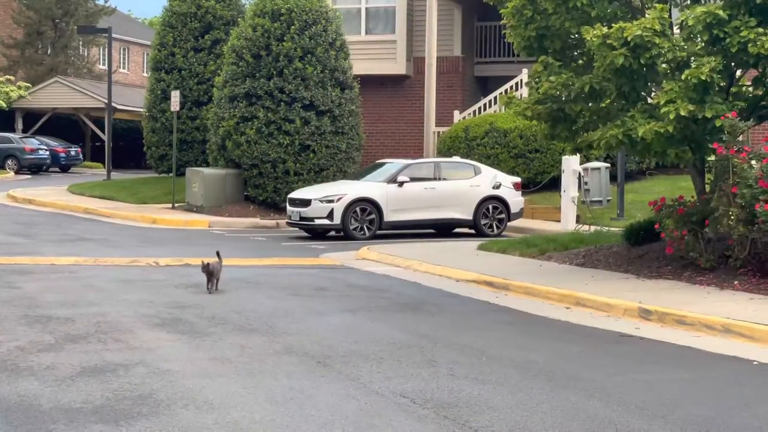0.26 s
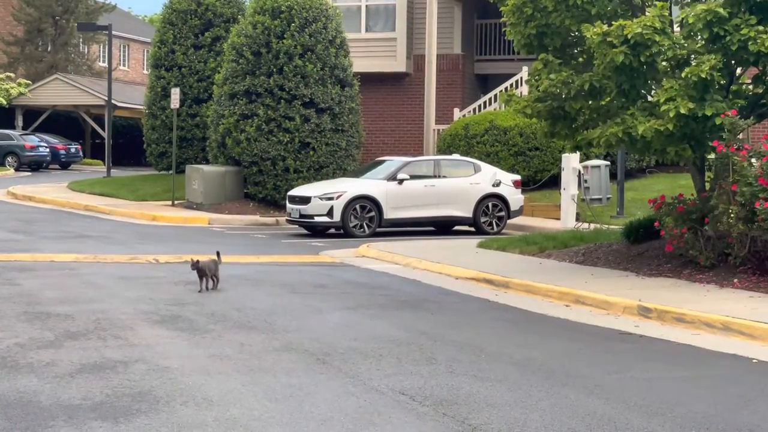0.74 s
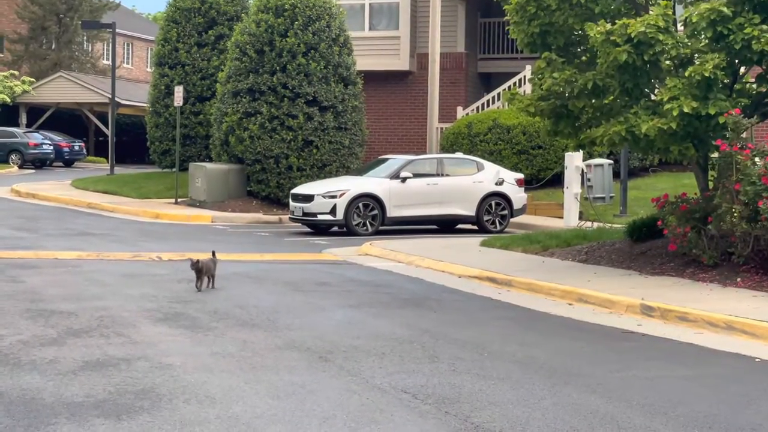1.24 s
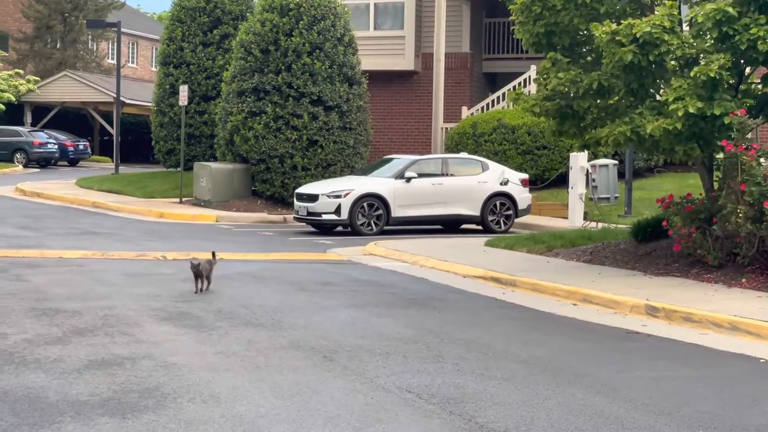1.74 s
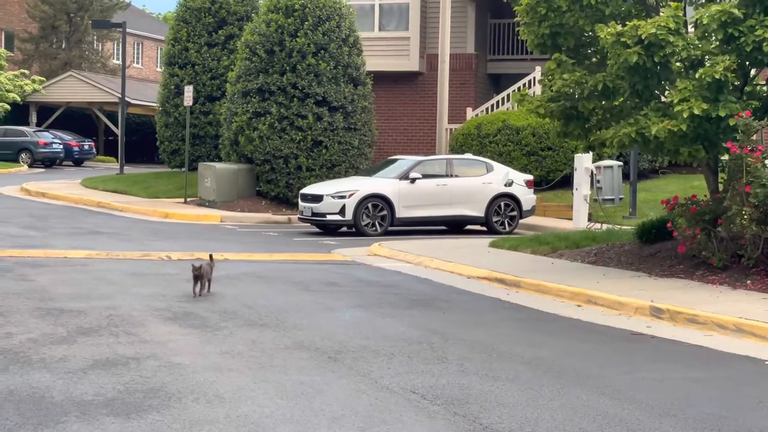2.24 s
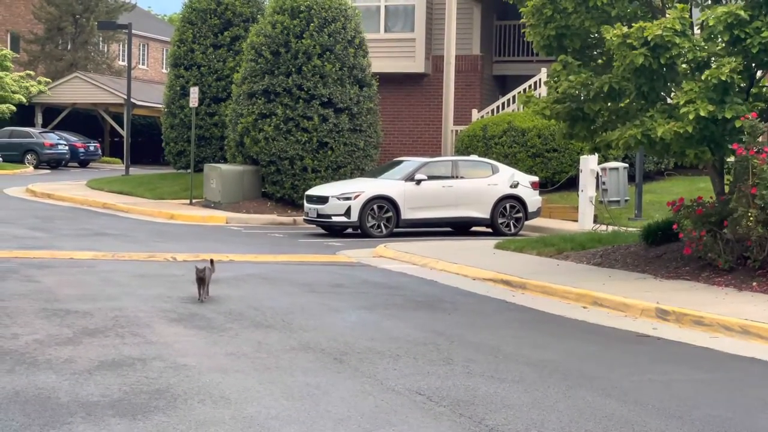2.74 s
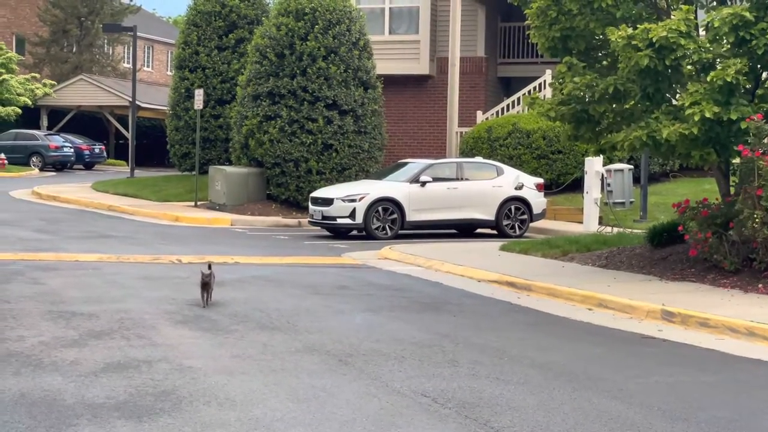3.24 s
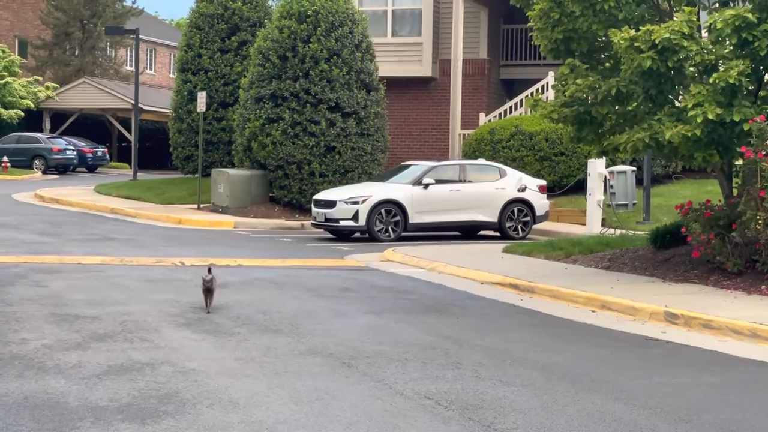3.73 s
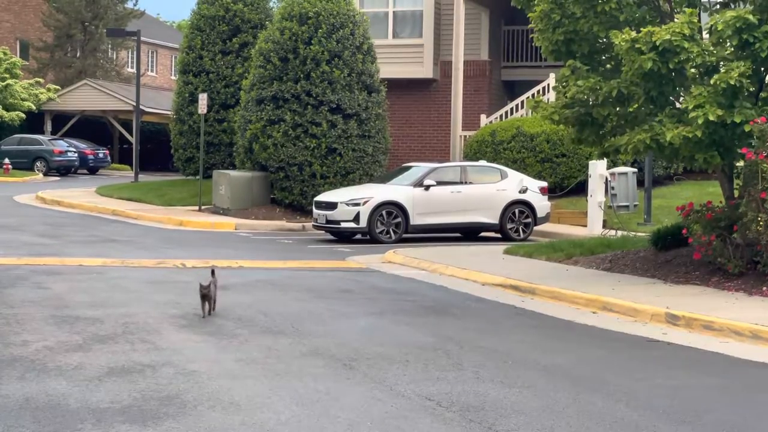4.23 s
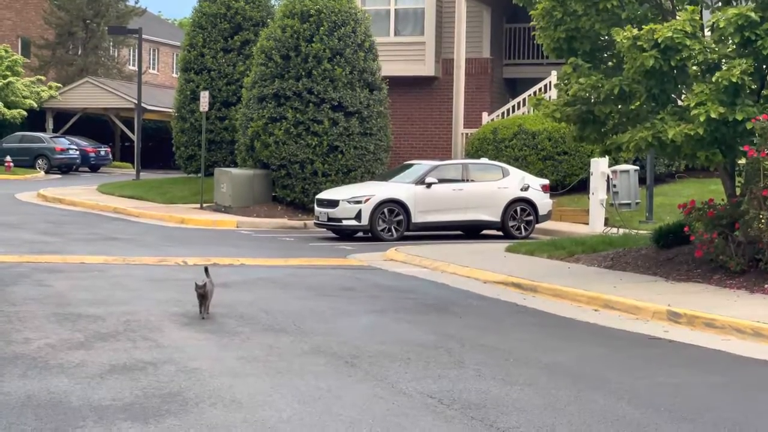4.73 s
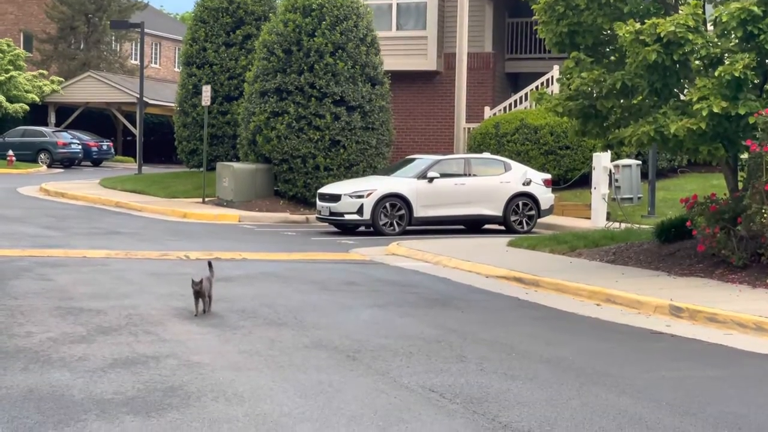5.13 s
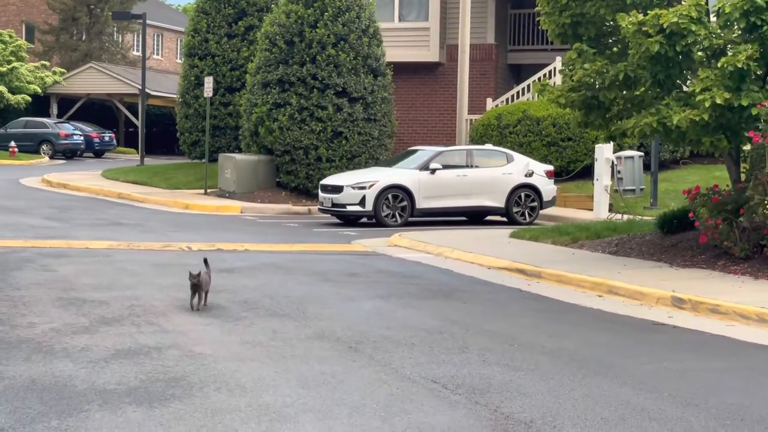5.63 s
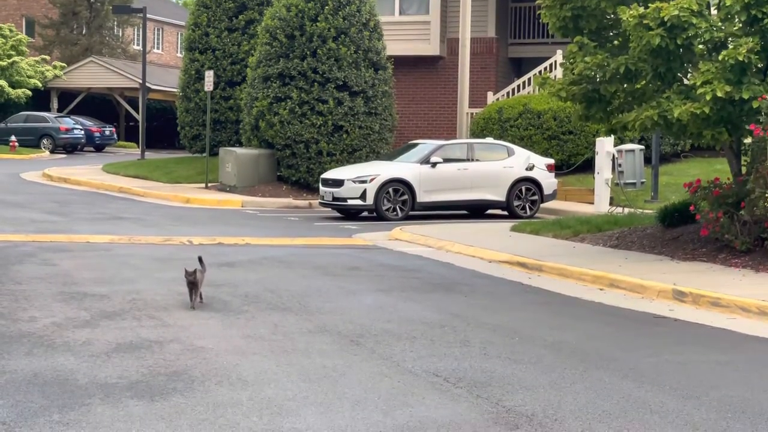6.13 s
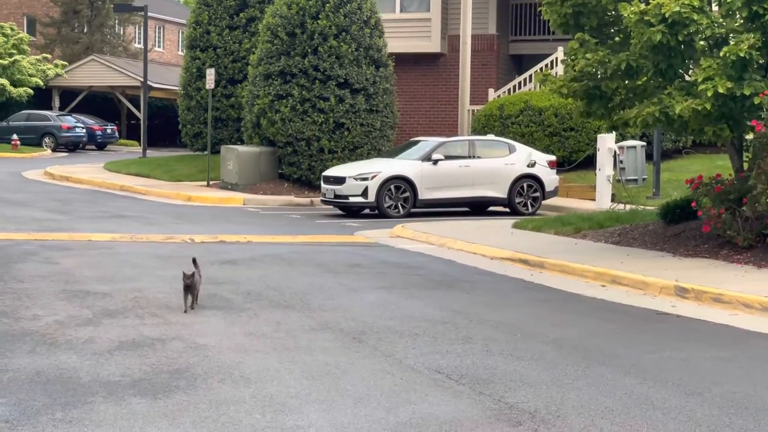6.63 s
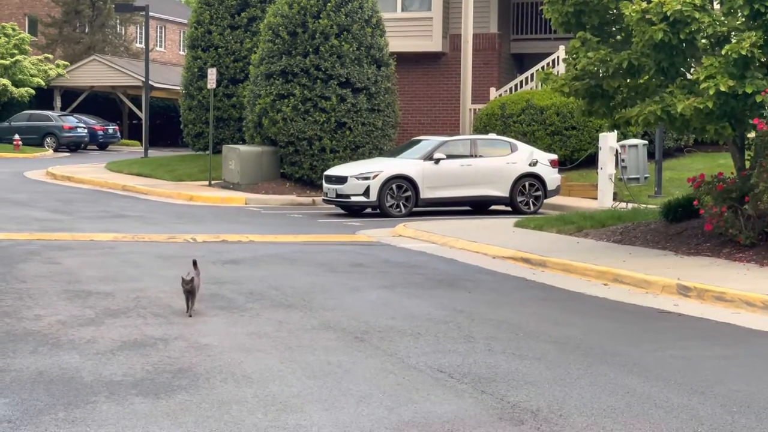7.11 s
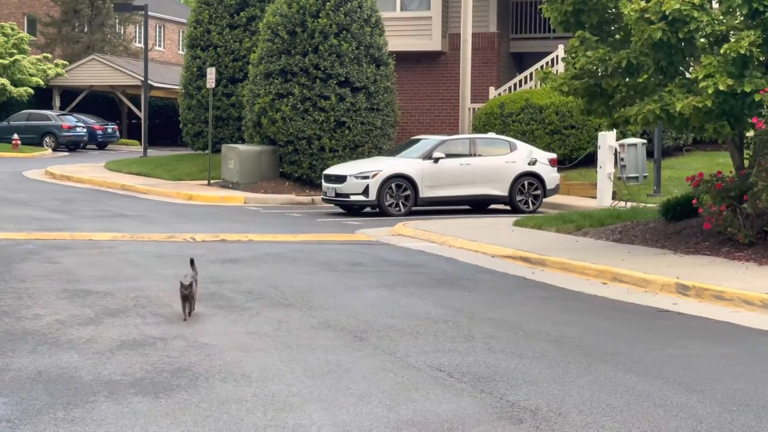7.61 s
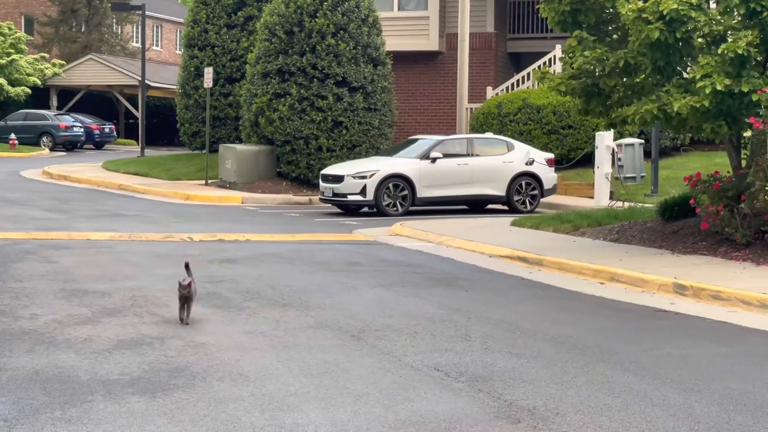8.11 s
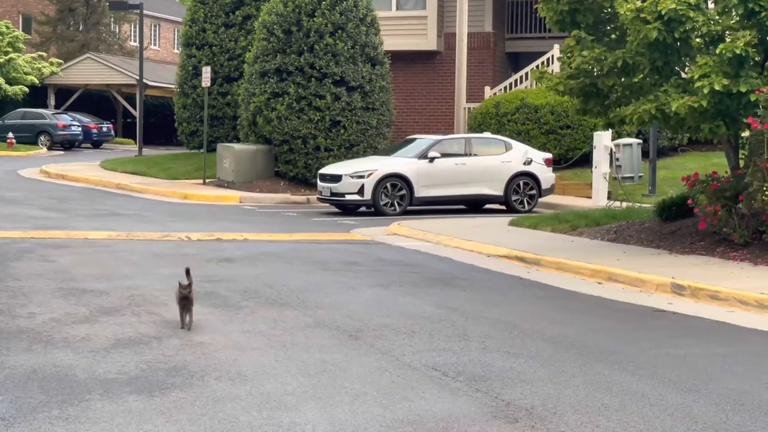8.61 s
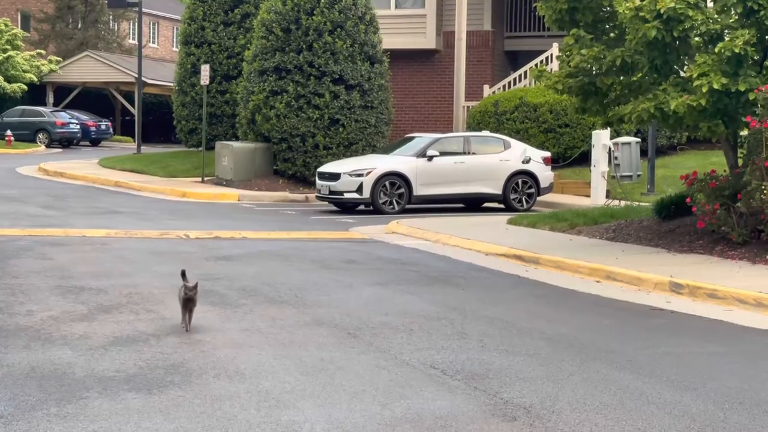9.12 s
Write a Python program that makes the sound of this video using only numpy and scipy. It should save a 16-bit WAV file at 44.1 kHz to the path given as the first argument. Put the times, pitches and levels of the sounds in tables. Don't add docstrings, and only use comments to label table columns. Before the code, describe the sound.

An outdoor car park with a constant low rumble of distant traffic and two idling engines softly throbbing. Several far songbirds call in short bursts: rasping chirps, quick slurs and low whistles, all blurred by leaves and walls. A vehicle pulls away faintly in the middle. Tiny bright clicks sound close to a small stereo microphone, and two fast buzzes and a thin high whistle come near the end.

```python
import sys
import numpy as np
from scipy import signal
from scipy.fft import rfft, irfft, next_fast_len
from scipy.io import wavfile
from scipy.ndimage import uniform_filter1d, minimum_filter1d

SR = 44100
rng = np.random.default_rng(int(sys.argv[2]) if len(sys.argv) > 2 else 0)


def makeup_ratio(level_db):
    decades = np.asarray(level_db, float) / 20
    return 10 ** decades


def store_wav(level_fs):
    pcm = np.round(np.clip(np.atleast_2d(level_fs), -1, 1) * 32767)
    wavfile.write(sys.argv[1], SR, pcm.T.astype(np.int16))


N = 412776

# [t/s, rumble level/dB]
TRAFFIC_LEVEL = [
    (0.0, -41.5),
    (.7, -41),
    (2.1, -40.5),
    (2.34, -41.5),
    (3.278, -38),
    (3.5, -42),
    (5.24, -45.5),
    (5.81, -41.5),
    (7.14, -43.5),
    (9.36, -42),
]
# [t/s, gain/dB]
VEHICLE_PASSES = [
    (.25, 11),
    (2.75, 8.5),
    (5.24, 4.5),
    (8.4, 2.5),
]
# [f/Hz, density/dB per Hz]
RUMBLE_SPECTRUM = [(12, -42), (24, -19.5), (45, -7), (68, -1), (102, -4.5), (217, -9), (305, -23.5),
                   (365, -39), (420, -29), (550, -42.5), (920, -120)]
ROAR_SPECTRUM = [(250, -31), (310, -2.5), (360, 13), (420, -5.5), (520, -45.5)]
TYRE_SPECTRUM = [(200, -22), (330, 4), (630, -1), (1000, -1), (1300, -6.5), (2000, -10.5), (2600, -14.5),
                 (3300, -19), (4200, -23), (5200, -28), (6300, -40.5), (8500, -48.5)]
AIR_SPECTRUM = [(3000, -42), (6300, -33), (8500, -37.5), (10500, -39), (12300, -42)]
# [f/Hz, correlation]
PORT_LIKENESS = [(60, 0.99), (200, 0.99), (460, 0.83), (1050, 0.66), (1600, 0.53), (2200, 1), (3600, 0.97),
                 (5400, 1), (9000, 0.99)]
IDLE_HZ = [57.16, 71.47]
# [t/s, peak level/dB]
IDLE_SURGES = [
    [(.13, -32), (.83, -33), (1.38, -39), (2.0, -42), (2.55, -33), (2.86, -36), (3.52, -41.5),
     (3.75, -34.5), (4.04, -41.5), (4.35, -33), (4.72, -33), (5.37, -36), (6.2, -37), (6.67, -33.5),
     (6.9, -35.5), (7.4, -36), (7.81, -34), (8.05, -37), (8.32, -34), (8.58, -44), (9.07, -45)],
    [(.1, -34), (.26, -35), (.56, -33.5), (.88, -35), (1.48, -44), (1.8, -35), (2.35, -34.5), (2.89, -34),
     (3.15, -44), (3.51, -34.5), (3.8, -39), (4.04, -40), (4.41, -36), (4.97, -35.5), (5.16, -37),
     (5.59, -30), (5.81, -32), (6.41, -35.5), (6.7, -46), (6.9, -45), (7.22, -31.5), (7.4, -35.5),
     (7.82, -36), (8.04, -34.5), (8.69, -37), (8.92, -37.5), (9.23, -37)],
]
# [start/s, length/s, centre f/Hz, swing/Hz, level/dB]
CHATTER_NOTES = [(0, 0.13, 3110, 392, -68), (-0.2, 0.052, 5800, 300, -85), (.93, 0.15, 5480, 300, -79),
                 (1.8, 0.046, 3830, 403, -74), (1.545, 0.19, 5100, 450, -70), (1.7, 0.17, 4760, 496, -71.5),
                 (2, 0.1, 3610, 300, -70), (2.64, 0.15, 4550, 350, -73), (2.78, .16, 5480, 600, -77.5),
                 (2.82, 0.085, 4160, 500, -68.5), (3.12, 0.057, 4250, 400, -69), (3.5, .15, 5800, 397, -95),
                 (3.34, 0.2, 3900, 652, -67), (3.475, 0.07, 5410, 600, -70), (4.5, 0.49, 4920, 710, -79.5),
                 (4.97, .12, 6500, 400, -86), (5.57, 0.18, 4470, 603, -77), (5.575, 0.14, 2550, 202, -65),
                 (6.205, 0.093, 5450, 400, -76), (6.31, 0.18, 5500, 700, -80), (6.5, 0.045, 3920, 650, -78),
                 (6.71, 0.15, 4700, 587, -78), (8.5, 0.17, 4400, 790, -68.5),
                 (9.075, 0.099, 5020, 550, -68)]
# [start/s, length/s, lower voice f/Hz, lower level/dB, upper level/dB]
RASPING_CHIRPS = [
    (0.91, 0.19, 3760, -63.5, -68),
    (1.918, 0.15, 3670, -63.5, -71.5),
    (2.829, 0.18, 3300, -65, -74),
    (3.249, 0.18, 3700, -63, -67),
    (5.026, .17, 3396, -62.5, -68.5),
    (6.297, 0.14, 3400, -63.5, -74),
    (9.069, 0.17, 3580, -61.5, -63),
]
# [start/s, length/s, from f/Hz, to f/Hz, level/dB]
SMALL_SLURS = [(.15, 0.026, 4050, 4300, -73), (.174, 0.017, 4170, 4620, -67), (.19, 0.012, 6000, 5270, -65),
               (.215, 0.021, 5420, 4750, -65.5), (.236, .012, 4300, 4080, -63),
               (.262, 0.024, 3930, 4000, -68), (.282, 0.042, 4140, 5100, -62),
               (.302, 0.014, 5800, 5400, -66), (.324, 0.019, 5420, 4480, -67), (.92, .03, 4900, 5330, -71),
               (1.6, 0.028, 5740, 4960, -69), (.93, 0.037, 4700, 3880, -71), (.935, 0.035, 4920, 5600, -71),
               (1.588, 0.025, 5750, 5290, -69), (1.64, 0.029, 3580, 5200, -64),
               (1.672, .03, 3620, 5400, -63), (1.895, .019, 5270, 4470, -63),
               (2.255, 0.015, 5560, 5100, -73.5), (3.255, 0.016, 5100, 4400, -66),
               (3.552, 0.053, 3860, 4600, -68), (6.222, 0.019, 3830, 4170, -71),
               (6.223, 0.032, 4330, 4650, -70), (6.256, 0.014, 4700, 4320, -68),
               (6.296, 0.016, 4600, 4170, -62), (6.255, .012, 3770, 4050, -67),
               (6.302, 0.053, 2950, 3420, -65), (6.46, .02, 3900, 4580, -69)]
# [start/s, length/s, f/Hz, level/dB]
SMALL_PEEPS = [(.97, .05, 4510, -72), (.988, .032, 3390, -69), (1.54, .015, 6150, -81),
               (1.617, 0.022, 5200, -71), (1.916, 0.028, 3880, -64), (1.94, 0.022, 3540, -59.5),
               (2.008, 0.053, 3930, -71), (2.615, 0.051, 5340, -67.5), (3.272, .022, 3900, -62),
               (3.291, .045, 3400, -70), (3.35, .022, 3890, -63), (5.0, 0.059, 5700, -78),
               (5.007, 0.029, 4700, -72), (6.235, 0.025, 4200, -67), (6.24, 0.028, 4600, -67),
               (6.32, 0.046, 4600, -70), (6.36, 0.022, 3050, -66.5), (6.44, .04, 4530, -70),
               (6.45, 0.026, 4150, -70), (2.985, .025, 3000, -67), (3.03, .03, 3400, -74),
               (7.575, 0.033, 4250, -71), (9.031, .047, 3770, -66), (9.075, 0.027, 3450, -65),
               (9.108, 0.026, 3870, -64), (9.184, 0.032, 3880, -62.5), (9.105, .045, 3440, -62),
               (9.347, 0.014, 3300, -59.5)]
# [start/s, length/s, from f/Hz, to f/Hz, level/dB]
ARCHED_NOTES = [
    (6.258, .038, 4330, 2830, -63),
    (6.277, .046, 4230, 3220, -60),
    (6.306, .04, 4220, 3880, -58.5),
    (6.328, .028, 3700, 2880, -65),
    (6.352, .04, 3420, 2880, -61),
    (6.41, .025, 3400, 2700, -64),
    (5.078, .048, 3500, 2300, -57.5),
    (2.93, .04, 3500, 2850, -66),
]
# [start/s, level/dB]
SIGH_CALLS = [
    (.69, -80),
    (1.586, -77),
    (2.221, -80),
    (6.562, -80),
]
# [from f/Hz, to f/Hz]
SIGH_PITCH_HZ = (5800, 5200)
# [start/s, length/s, from f/Hz, to f/Hz, level/dB]
LOW_SINGER_SLURS = [(.27, 0.057, 3650, 3050, -65), (3.45, 0.073, 2880, 2430, -64),
                    (3.845, 0.14, 2965, 2410, -67), (4.412, .052, 3454, 2780, -58),
                    (4.418, 0.041, 3850, 3050, -60.5), (4.553, 0.059, 2680, 2410, -66),
                    (4.776, 0.028, 3600, 4000, -67), (5.01, 0.047, 3900, 3660, -65),
                    (5.045, 0.018, 2780, 3480, -55.5), (5.052, 0.018, 3740, 4060, -70),
                    (5.135, 0.021, 2150, 2300, -58), (5.34, 0.016, 2680, 2420, -63),
                    (5.575, 0.08, 2694, 2340, -61.5), (5.594, 0.087, 3710, 2980, -65.5),
                    (5.734, 0.065, 2720, 2530, -64.5),              (7.281, 0.014, 2510, 2300, -64),
                    (7.607, 0.063, 3740, 3450, -72.5)]
# [start/s, length/s, f/Hz, level/dB]
LOW_SINGER_HELD = [(4.02, 0.092, 2625, -64.5), (4.234, 0.018, 3270, -71), (4.46, 0.064, 2814, -55),
                   (4.542, 0.067, 2900, -58), (4.604, 0.028, 2480, -52.5), (4.528, 0.015, 2910, -61),
                   (4.628, .13, 2594, -59), (4.68, 0.05, 2890, -64), (4.788, 0.063, 2460, -59),
                   (4.862, 0.074, 2605, -68), (4.99, 0.043, 2740, -66), (5.031, 0.037, 2740, -56),
                   (5.065, .04, 2710, -65), (5.13, 0.078, 2760, -79), (5.53, 0.044, 3035, -59.5),
                   (5.814, 0.028, 2570, -64.5), (5.865, 0.018, 2470, -62)]
CLICK_TIMES_S = [.7762, .839, 5.2902, 7.841, 7.9139, 8.1314]
# [peak/dB, low, middle, top ring re peak/dB, bounce gain/dB]
CLICK_LEVELS = [
    (-32.5, -16, -3, -6, -3),
    (-34, -10, -10, -5, 3),
    (-31.5, -15, -25, -9, -10),
    (-60, -3, 3, -14, -5),
    (-31.5, -17, -15, -7, -34),
    (-29, -12, -6.5, -7, -7),
]
RING_HZ = [8550, 3600, 6000, 11250, 15200, 9950]
RING_LAG_MS = [.3, 1.0, .7, .25, .2, .45]
RING_WIDTH_MS = [.155, .4, .25, .3, .2, .3]
TIP_DB = [-21, -50, -30, -45, -20, -42]
EDGE_DB = [-5, -8, -8, -20, -5, -2]
MAIN_RING_RATIO = [.92, .95, .9, .75, 1.0, 1.0]
# [delay/ms, level/dB]
CLICK_BOUNCES = [
    (1.4, -12),
    (2.7, -10),
    (4.0, -16),
]
# [turning point/s, lead-in level/dB, fall level/dB, flick level/dB]
HOOKED_CALLS = [
    (1.842, -76, -74, -70),
    (2.725, -94, -83, -79),
    (4.577, -96, -67, -61),
    (5.702, -80, -69, -63),
    (6.811, -80, -71, -63),
    (7.82, -78, -69, -62.5),
]
HOOK_CURVE_S = (-.055, -.03, -.002, .012, .028)
HOOK_CURVE_HZ = (4350, 4150, 3980, 4130, 4520)
# [t/s, f/Hz, level/dB]
ENGINE_PULL = [
    (4.0, 111.1, -54),
    (4.07, 111.5, -47),
    (4.18, 103, -49.5),
    (4.658, 103, -41),
    (4.954, 105, -49),
    (4.968, 104.3, -41),
    (5.1, 102, -67),
]
# [t/s, centre f/Hz, swing rate/Hz, level/dB]
BUZZ_CURVES = [
    [(8.29, 4800, 180, -85), (8.322, 4810, 165, -56.5), (8.352, 4780, 164, -54.5), (8.4, 4780, 153, -58.5),
     (8.435, 4736, 150, -56), (8.53, 4745, 137, -59.5), (8.6, 4710, 160, -74), (8.62, 4730, 160, -78)],
    [(8.735, 4695, 150, -70), (8.78, 4645, 134, -49), (8.8, 4682, 140, -50.5), (8.87, 4660, 160, -55),
     (8.915, 4700, 143, -48), (8.97, 4640, 170, -72), (9.04, 4674, 164, -57), (9.07, 4700, 164, -83)],
]
BUZZ_DEPTH_HZ = [275, 250]
# [t/s, level/dB]
SEEP_LEVEL = [
    (9.145, -91),
    (9.164, -67),
    (9.204, -55.5),
    (9.228, -76),
    (9.25, -57),
    (9.28, -48.5),
    (9.336, -65),
    (9.36, -53),
]
# [f/Hz, phase/rad]
PORT_PHASE_RAD = [(0, 0), (300, .1), (1120, .45), (1720, -.6), (2000, -.1), (3300, .6), (4700, .5),
                  (5700, .45), (6700, .2), (7700, .5), (8750, 0), (9200, -1.5), (9900, -2.6), (10500, -3.5),
                  (11100, -4.9), (11700, -5.7), (12300, -6.9), (13300, -7.9)]
# [f/Hz, level/dB]
PORT_BALANCE_DB = [(60, 0.5), (200, 1), (350, 1.5), (640, 2), (1150, 2.5), (2080, .5), (3750, -.5),
                   (6770, 0)]

ROAR_DB, TYRES_DB, TYRES_FADE_DB_PER_S, PASS_S = -23, -56.5, 0.43, 0.4
FAR_EDGE_HZ, TAIL_EDGE_HZ, MIC_EDGE_HZ = 12550, 9000, 16300
IDLE_DB, SURGE_RISE_DB_PER_S, SURGE_FALL_DB_PER_S = -47.5, 167.5, 106.5
CHATTER_PER_S, LOWER_SWING_HZ, UPPER_SWING_HZ = 105, 360, 420
UPPER_RATIO, LOWER_LATE, SLIDE = 1.25, .22, .1
PEEP_DROOP, SIGH_S = .015, 0.09
SAG, ARCH = .42, .76
LEAD_EARLY_S, LEAD_S, LEAD_HZ = 0.11, 0.059, 5270
BUZZ_UNEVEN, SEEP_HZ, LIMIT = .028, 7255, .06


def evened(x):
    return x / np.sqrt(np.mean(x ** 2) + 1e-20)


def read(points, hz):
    f, value = np.transpose(points)
    return np.interp(np.log(hz + 1), np.log(f + 1), value)


def add(mix, s, sound):
    part = mix[max(round(s * SR), 0):][:len(sound)]
    part += sound[:len(part)]


def drift(n, hz):
    size = max(int(SR / hz / 2), 1)
    wander = uniform_filter1d(uniform_filter1d(rng.standard_normal(n), size), size)
    return evened(wander - wander.mean())


def note(hz, db, edge):
    sine = np.sin(2 * np.pi * np.cumsum(hz) / SR)
    return np.sqrt(2) * makeup_ratio(db) * sine * signal.windows.tukey(len(hz), np.clip(edge, 0, 1))


def tone(rows):
    s, hz, db = np.transpose(rows)
    t = np.arange(N) / SR
    level = uniform_filter1d(makeup_ratio(np.interp(t, s, db, left=-140, right=-140)), size=200)
    return np.sqrt(2) * level * np.sin(2 * np.pi * np.cumsum(np.interp(t, s, hz)) / SR)


def yard(x, t60, gap_ms):
    t, out = np.arange(0, min(t60, .5), 1 / SR), 0
    for k in range(3):
        taps = rng.standard_normal((2, len(t))) * (rng.random((2, len(t))) < .05)
        taps *= makeup_ratio(-60 * t / t60) * (t > gap_ms / 1000)
        taps[1] = 2.6 * taps[0] + 0.5 * taps[1]
        taps /= np.linalg.norm(taps, axis=1)[:, None]
        share = np.sqrt(2 / 3) * np.cos(np.pi * (np.arange(N) / SR * 16 + k / 3))
        out = out + signal.oaconvolve(share * x[None], taps, axes=1)[:, :N]
    return out


def traffic():
    frames, hz = N // 512 + 5, np.fft.rfftfreq(2048, 1 / SR)
    a, b, c, d, patches = rng.standard_normal((frames, 1025, 5)).T
    patches = evened(uniform_filter1d(uniform_filter1d(patches, 6, 0), 6, 1))
    t = np.arange(frames) * 512 / SR
    s, level_db = np.transpose(TRAFFIC_LEVEL)
    flow_db = np.interp(t, s, level_db)
    passing_db = sum(db * np.exp(-((t - at) / PASS_S) ** 2) for at, db in VEHICLE_PASSES)
    rumble = makeup_ratio(read(RUMBLE_SPECTRUM, hz)[:, None] + flow_db + 26.0)
    roar = makeup_ratio(read(ROAR_SPECTRUM, hz)[:, None] + flow_db + ROAR_DB + passing_db + 11.5)
    tyres = makeup_ratio(read(TYRE_SPECTRUM, hz)[:, None] + TYRES_DB - TYRES_FADE_DB_PER_S * t + 13.5)
    air_power = makeup_ratio(2 * read(AIR_SPECTRUM, hz) - 92.0)[:, None]
    same = np.clip(read(PORT_LIKENESS, hz), -1, 1)[:, None]
    left = a + 1j * b
    z = np.array([left, same * left + np.sqrt(1 - same ** 2) * (c + 1j * d)])
    z *= np.sqrt(rumble ** 2 + roar ** 2 + tyres ** 2 + air_power) * makeup_ratio(1.32 * patches - 25.5)
    z /= np.sqrt(1 + (hz / FAR_EDGE_HZ) ** 160)[:, None]
    return signal.istft(z, nperseg=2048, noverlap=1536)[1][:, :N]


def idling_engines():
    t, out = np.arange(0, N / SR + .01, .005), 0
    for hz, rows in zip(IDLE_HZ, IDLE_SURGES):
        s, peak_db = np.transpose(rows)[:, :, None]
        db = peak_db - np.maximum(SURGE_RISE_DB_PER_S * (s - t), SURGE_FALL_DB_PER_S * (t - s))
        db = np.interp(np.arange(N) / SR, t, np.maximum(db.max(0), IDLE_DB))
        out = out + note(hz * (1 + 0.0518 * drift(N, 4.91)), db - 1.5, 0)
    return out


def warbles(rows, per_s, uneven, edge, slide):
    out = np.zeros(N)
    for k, (start, long, centre_hz, swing_hz, db) in enumerate(rows):
        if k % 8 == 0:
            pace, depth, wander, gasp = drift(N, 40), drift(N, 50), drift(N, 95), drift(N, 70)
        n = round(long * SR)
        at = np.minimum(round(start * SR) + np.arange(n) + k % 8 * 9000, N - 1 - np.arange(n))
        turn = 2 * np.pi * np.cumsum(per_s * (1 + uneven * pace[at])) / SR
        swing = .5 * np.sin(turn) * (1 - uneven * np.tanh(depth[at])) + .6 * wander[at]
        hz = centre_hz * (1 + slide * np.linspace(.5, -.5, n)) + swing_hz * swing
        add(out, start, note(hz, db + np.linspace(2.5, -3.5, n) + 3.3 * gasp[at], edge))
    return out


def harsh_calls():
    rows = list(CHATTER_NOTES)
    for s, long, hz, _, db in RASPING_CHIRPS:
        rows.append((s, long * (1 - LOWER_LATE / 2), hz * UPPER_RATIO, UPPER_SWING_HZ, db))
    for s, long, hz, db, _ in RASPING_CHIRPS:
        rows.append((s + long * LOWER_LATE, long * (1 - LOWER_LATE), hz, LOWER_SWING_HZ, db))
    return warbles(rows, CHATTER_PER_S, .35, .6, SLIDE)


def whistles(rows, tremor_db, bend=SAG):
    out, waver, tremor = np.zeros(N), drift(N, 120), drift(N, 90)
    for start, long, from_hz, to_hz, db, *own_bend in rows:
        u = np.linspace(0, 1, round(long * SR))
        share = own_bend[0] if own_bend else bend
        middle_hz = min(from_hz, to_hz) + share * abs(to_hz - from_hz)
        hz = np.polyval(np.polyfit([0, .5, 1], [from_hz, middle_hz, to_hz], deg=2), u)
        at = np.minimum(round(start * SR) + np.arange(len(u)), N - 1)
        add(out, start, note(hz * (1 + 0.007 * waver[at]), db + tremor_db * tremor[at], 0.3))
    return out


def small_birds():
    rows = SMALL_SLURS + [(*row, ARCH) for row in ARCHED_NOTES]
    rows += [(s, SIGH_S, *SIGH_PITCH_HZ, db) for s, db in SIGH_CALLS]
    rows += [(s, long, hz * (1 + PEEP_DROOP), hz * (1 - PEEP_DROOP), db) for s, long, hz, db in SMALL_PEEPS]
    rows += [(s - LEAD_EARLY_S, LEAD_S, LEAD_HZ, LEAD_HZ, lead_db) for s, lead_db, _, _ in HOOKED_CALLS]
    return whistles(rows, 2.4)


def low_singer():
    return whistles(LOW_SINGER_SLURS + [(s, long, hz, hz, db) for s, long, hz, db in LOW_SINGER_HELD], 2.0)


def clicks():
    out, ms = np.zeros(N), np.arange(200) * 1000 / SR
    each = zip(CLICK_TIMES_S, CLICK_LEVELS, TIP_DB, EDGE_DB, MAIN_RING_RATIO)
    for s, (db, *rel_db, bounce_db), tip_db, edge_db, ratio in each:
        ring_hz = [RING_HZ[0] * ratio] + RING_HZ[1:]
        ring_db = [0] + rel_db + [tip_db, edge_db]
        phases = np.resize(rng.random(5), 6)
        snap = 0
        for hz, lag, width, r, p in zip(ring_hz, RING_LAG_MS, RING_WIDTH_MS, ring_db, phases):
            swell = np.exp(-((ms - .7 - lag) / width) ** 2)
            snap = snap + makeup_ratio(db + r) * swell * np.sin(2 * np.pi * (hz * ms / 1000 + p))
        add(out, s, snap)
        for (late_ms, echo_db), chance in zip(CLICK_BOUNCES, rng.uniform(0.81, 0.91, 3)):
            add(out, s + late_ms * chance / 1000, makeup_ratio(echo_db + bounce_db) * snap)
    return out


def hooks():
    out, t = np.zeros(N), np.arange(HOOK_CURVE_S[0], HOOK_CURVE_S[-1], 1 / SR)
    hz = uniform_filter1d(np.interp(t, HOOK_CURVE_S, HOOK_CURVE_HZ), size=400, mode="nearest")
    for s, _, fall_db, flick_db in HOOKED_CALLS:
        db = np.interp(t, [-.008, .008], [fall_db, flick_db])
        add(out, s + HOOK_CURVE_S[0], note(hz, db, 0.15))
    return out


def engine_pull():
    return tone(ENGINE_PULL)


def buzzes():
    out, t = np.zeros(N), np.arange(N) / SR
    for rows, swing_hz in zip(BUZZ_CURVES, BUZZ_DEPTH_HZ):
        s, centre_hz, per_s, db = np.transpose(rows)
        turn = 2 * np.pi * np.cumsum(np.interp(t, s, per_s) * (1 + BUZZ_UNEVEN * drift(N, 40))) / SR
        hz = np.interp(t, s, centre_hz) + swing_hz * np.sin(turn) * (1 + 0.1 * drift(N, 25))
        throb_db = 2.5 * np.cos(turn) + .8 * np.sin(turn) + 1.8 * np.cos(turn / 2) + 1.5 * drift(N, 45)
        out += note(hz, np.interp(t, s, db, left=-140, right=-140) + throb_db, 0)
    return out


def seep():
    return tone([(s, SEEP_HZ, db) for s, db in SEEP_LEVEL]) * makeup_ratio(2.2 * drift(N, 60))


def scene():
    low, small, near = low_singer(), small_birds() + hooks(), clicks()
    harsh, buzz = harsh_calls(), buzzes()
    blur = yard(low * makeup_ratio(-10) + small * makeup_ratio(-9) + buzz * makeup_ratio(-10), .07, 2)
    leaves = low * makeup_ratio(-3) + small * makeup_ratio(-3) + blur
    echo = yard((low + small) * makeup_ratio(-5.5) + harsh * makeup_ratio(-1.0) + buzz * makeup_ratio(-10), 1.0, 14)
    birds = leaves * makeup_ratio(0.78 * drift(N, 45)) + harsh * makeup_ratio(-5) + buzz * makeup_ratio(-6.5) + echo
    dull = signal.sosfilt(signal.butter(8, TAIL_EDGE_HZ, fs=SR, output="sos"), near)
    click_tail = makeup_ratio(-22.5) * yard(dull, 0.42, 1.5)
    return birds + seep() + near + click_tail + idling_engines() + engine_pull() + traffic()


def top_cut(x):
    return signal.sosfilt(signal.butter(12, 16600, fs=SR, output="sos"), x)


def record(dry):
    size = next_fast_len(N + 4096)
    hz = np.fft.rfftfreq(size, 1 / SR)
    band = 1 / np.sqrt((1 + (35 / (hz + 1)) ** 10) * (1 + (hz / MIC_EDGE_HZ) ** 160))
    port = makeup_ratio(read(PORT_BALANCE_DB, hz) / 2) * np.exp(.5j * read(PORT_PHASE_RAD, hz))
    running = np.pad(dry, ((0, 0), (2048, 2048)), "reflect")
    heard = irfft(rfft(running, size) * band * np.array([port, 1 / port]), size)[:, 2048:N + 2048]
    over = np.maximum(-minimum_filter1d(-abs(heard).max(0), size=600) / LIMIT, 1)
    fade_out = np.minimum((N - np.arange(N)) / 30, 1)
    heard = heard / uniform_filter1d(over, size=600) * fade_out
    return top_cut(heard)


dry = scene()
out = record(dry)
store_wav(out)
```